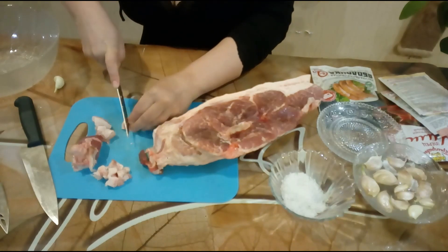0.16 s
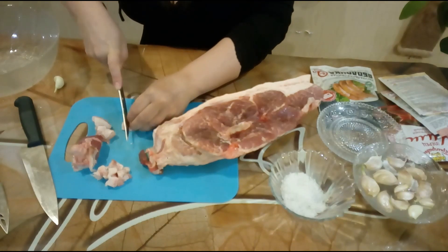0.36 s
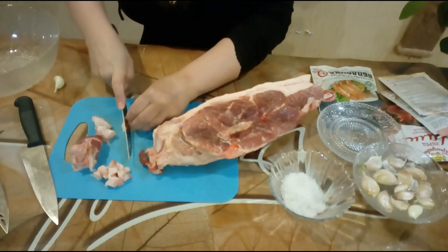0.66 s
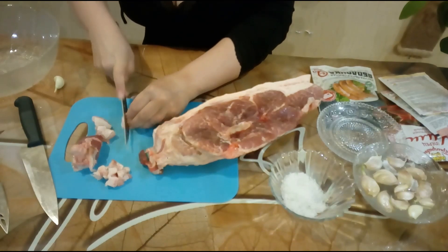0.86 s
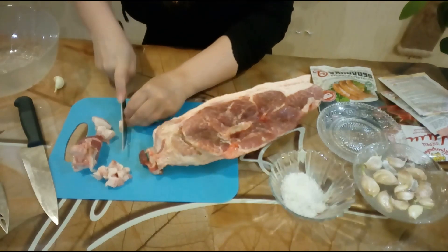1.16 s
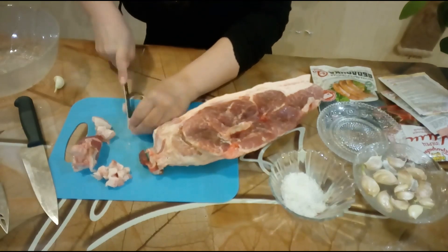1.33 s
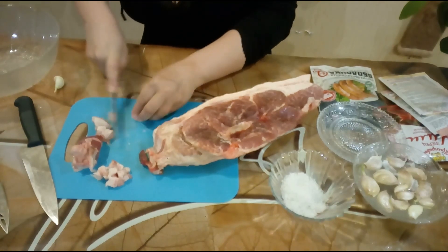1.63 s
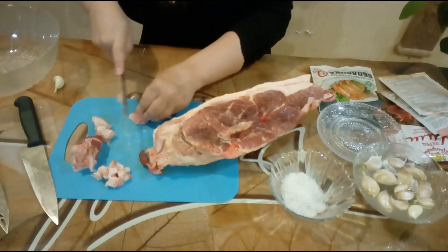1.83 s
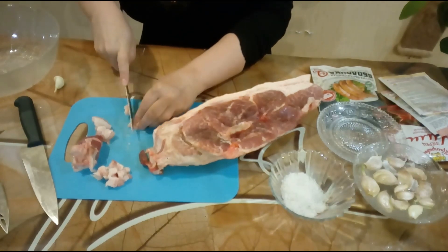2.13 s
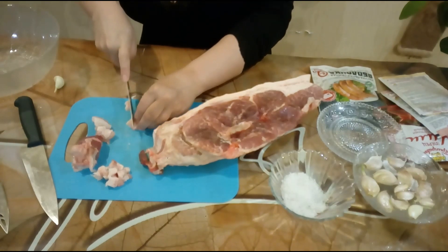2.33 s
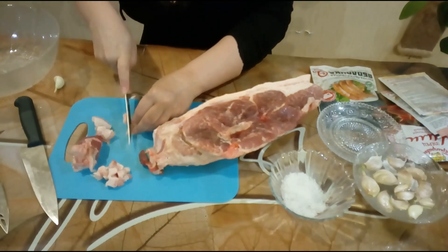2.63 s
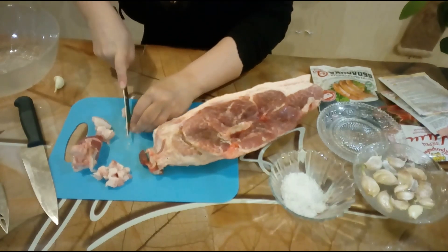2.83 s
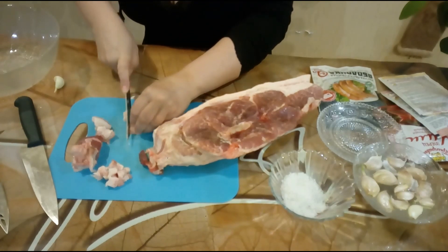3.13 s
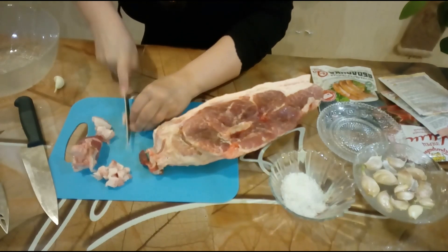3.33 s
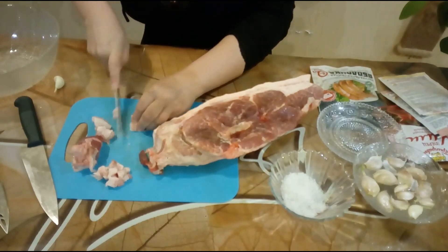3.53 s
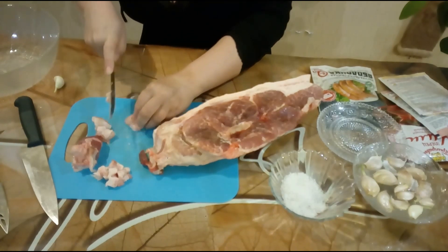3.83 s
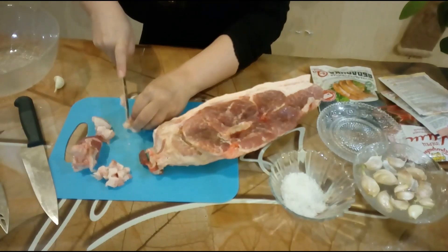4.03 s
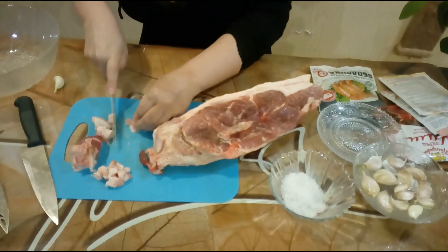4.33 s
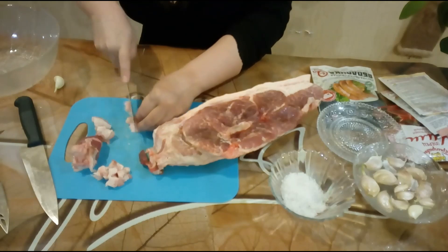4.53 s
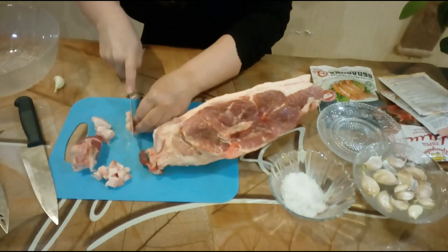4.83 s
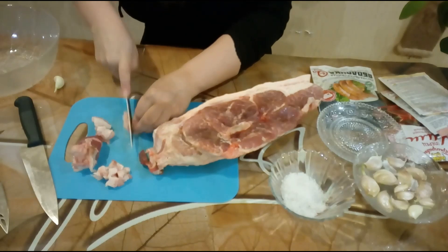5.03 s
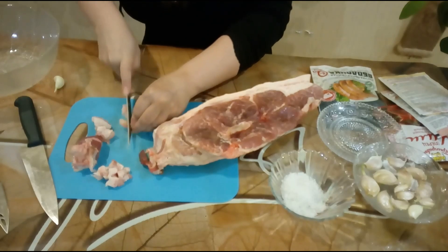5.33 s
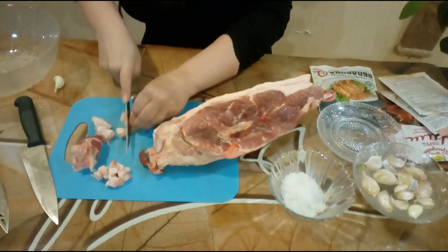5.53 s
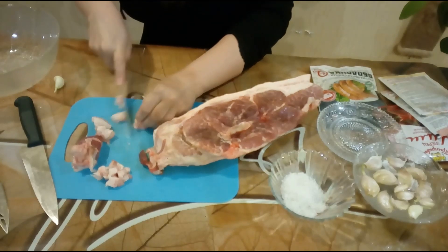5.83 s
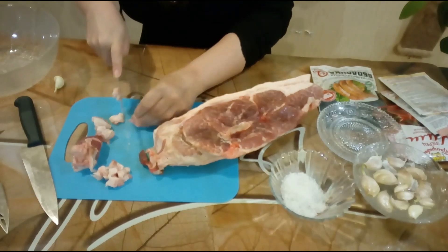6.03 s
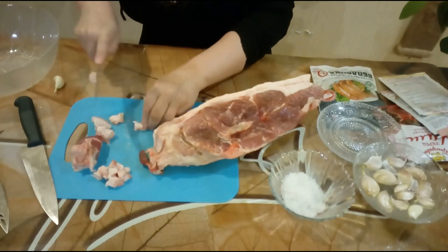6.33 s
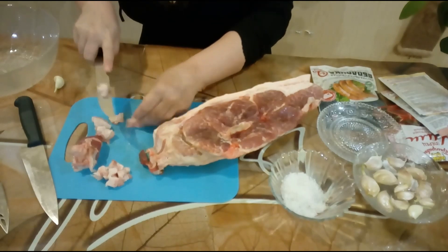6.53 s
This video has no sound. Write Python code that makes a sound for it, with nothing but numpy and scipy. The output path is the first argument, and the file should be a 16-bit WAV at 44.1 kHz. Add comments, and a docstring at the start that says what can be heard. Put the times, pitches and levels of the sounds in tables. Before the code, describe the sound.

In a small, slightly echoing kitchen with a faint appliance hum, a knife cuts fat on a plastic board, heard from nearby. A first run of quick rubbing strokes thuds through the wooden table and ends with a short scrape. A lighter second run ends in a squeaky flick of the blade. One sharp knock follows, then a third run of strokes and a last brief scrape.

```python
"""A small, live kitchen with a humming appliance. A knife saws fat into cubes on a plastic board
on a wooden table, in three runs of quick strokes. Each stroke is a swarm of tiny slips: force sets
the level, a leaning hand adds table thud, bare steel rings and sizzles. Each run ends with a sideways
flick of the edge. The knife knocks down twice: once cushioned by fat, once hard."""
import sys
import numpy as np
from scipy import signal
from scipy.fft import rfft, irfft, next_fast_len
from scipy.io import wavfile
from scipy.ndimage import uniform_filter1d, map_coordinates

SR = 44100
rng = np.random.default_rng(int(sys.argv[2]) if len(sys.argv) > 2 else 0)


def store_wav(level_fs):
    """Save 16-bit WAV to argv[1]."""
    pcm = np.round(np.clip(np.atleast_2d(level_fs), -1, 1) * 32767)
    wavfile.write(sys.argv[1], SR, pcm.T.astype(np.int16))


N = 293600
SIZE, GUARD = 2 ** 15, 512  # samples: one event with its echo, margin ahead of it
LEAD_S = .15  # from the start of an event's buffer to full pressure
HZ = np.fft.rfftfreq(SIZE, 1 / SR)
SIDES = np.array([[.5], [-.5]])  # left, right

# Contact spectra of table thud, edge drag and edge rasp. Each row: frequency in Hz, relative level in dB.
THUD_DB = [(20, -30), (50, -12.5), (115, -8), (165, -3.5), (215, 1), (330, -10), (450, -26.5), (700, -35.5),
           (3000, -61.5)]
DRAG_DB = [(100, -32.5), (300, -8.5), (480, 1), (680, -1), (1000, -5), (1400, -7.5), (2200, -16.5),
           (3200, -35.5), (9000, -79.5)]
RASP_DB = [(200, -50), (1000, -14), (2000, 1.5), (2800, 4.5), (3400, 0.5), (4800, -1), (6000, -5.5),
           (7200, -11.5), (8000, -25.5), (9600, -32.5), (12500, -47), (15500, -33)]


def amp(db):
    """Decibels to gain."""
    return 10 ** (np.asarray(db) / 20)


def unit(x):
    """Scale to rms 1."""
    return x / np.sqrt(np.mean(abs(x) ** 2) + 1e-20)


def along(points, hz):
    """Interpolate (Hz, value) points on a log axis."""
    f, v = np.transpose(points)
    return np.interp(np.log(hz + 1), np.log(f + 1), v)


def add(track, start_s, sound):
    """Mix in a stereo event, skipping ahead by its GUARD margin."""
    part = track[:, max(round(start_s * SR) - GUARD, 0):][:, :SIZE]
    part += sound[:, :part.shape[1]]


def wobble(knots_per_s):
    """Smooth random curve over time."""
    knots = rng.standard_normal(int(N * knots_per_s / SR) + 4)
    return map_coordinates(knots, [np.arange(N) * knots_per_s / SR])


def ripple(step_hz):
    """Smooth random curve over frequency."""
    return map_coordinates(rng.standard_normal(512), [HZ / step_hz], mode="mirror")


def pair(two, coherence):
    """Mix two independent spectra into left and right of the given coherence."""
    turn = np.arccos(np.clip(coherence, -1, 1)) / 2
    mid, side = two[0] * np.cos(turn), two[1] * np.sin(turn)
    return np.array([mid + side, mid - side])


def causal(db):
    """Minimum-phase response with the given gains."""
    cepstrum = irfft(np.log(amp(db)))
    cepstrum[1:SIZE // 2] *= 2
    cepstrum[SIZE // 2 + 1:] = 0
    return np.exp(rfft(cepstrum))


def room_air(level_db=-64):
    """Steady noise of the room."""
    # Each row: frequency in Hz, then relative level in dB / left over right in dB / stereo coherence.
    spectrum_db = [(12, -12), (25, -19.5), (55, -12), (92, 0), (165, -6), (300, -6.5), (520, -10),
                   (1200, -17), (2150, -13.5), (3260, -21), (4800, -16), (8000, -30), (11000, -32),
                   (15500, -33.5)]
    left_db = [(100, -4), (400, 0), (1300, -1), (2400, 3.5), (4400, 2), (8000, -1.5), (15000, 7)]
    coherence = [(40, 0.64), (180, 0.62), (500, 0.21), (1200, 0.17), (8000, 0.13)]
    hz = np.fft.rfftfreq(N, 1 / SR)
    colour = amp(along(spectrum_db, hz) + SIDES * along(left_db, hz))
    noise = pair(rfft(rng.standard_normal((2, N))), along(coherence, hz))
    return amp(level_db) * unit(irfft(noise * colour, N))


def appliance_hum(waver_db=2.5, drift_rad=0.65, left_db=-4):
    """Two tones, slightly unsteady in level and phase."""
    # Each row: frequency in Hz, rms level in dB.
    tones = [(187, -66), (560.5, -87.5)]
    t, hum = np.arange(N) / SR, np.zeros(N)
    for hz, db in tones:
        peak = np.sqrt(2) * amp(db + waver_db * wobble(7.0))
        hum += peak * np.sin(2 * np.pi * hz * t + drift_rad * wobble(18))
    return amp(SIDES * left_db) * hum


def kitchen(lag_s=.00004, bounce_s=.0069, bounce_db=-8, build_s=0.00067, scatter_hz=3500, spot_db=1.57):
    """Return carry(): spectrum to stereo sound by direct path, near bounce and a fresh echo."""
    # Each row: frequency in Hz, then T60 in s / echo level in dB / echo coherence / left over right in dB.
    t60_s = [(100, 0.45), (300, 0.34), (700, 0.42), (2500, 0.38), (5000, 0.31), (8000, 0.29), (15000, 0.24)]
    wet_db = [(100, 0), (300, 1.5), (1000, 3), (3000, 1), (8000, -3.5)]
    coherence = [(60, .5), (150, 0.81), (280, 1), (550, 0.67), (1200, -0.21), (2500, 0.081), (6000, 0.0005)]
    left_db = [(100, -5), (380, -1), (1300, -3), (2400, 0.5), (4400, -5.5), (8000, -6.5), (14000, 0)]
    hz, t, _ = signal.stft(np.zeros(SIZE), SR, nperseg=256)
    fade = amp(-60 * t / along(t60_s, hz)[:, None]) * (1 - np.exp(-t / build_s))
    direct = np.exp(-2j * np.pi * HZ * lag_s * (.5 + SIDES))  # left lags
    early = direct * (1 + amp(bounce_db) * np.exp(-2j * np.pi * HZ * bounce_s))
    wet, balance = amp(along(wet_db, HZ)), amp(SIDES * along(left_db, HZ))

    def band_rms(z):
        return np.sqrt(abs(uniform_filter1d(abs(z) ** 2, size=120, axis=-1)) + 1e-12)

    def carry(spectrum, echo_db=0):
        noise = signal.stft(rng.standard_normal((2, SIZE)), nperseg=256)[2]
        tail = rfft(signal.istft(noise * fade, nperseg=256)[1][:, :SIZE])
        echo = amp(echo_db) * wet * pair(tail / band_rms(tail), along(coherence, HZ))
        # Short waves scatter off hands and bowls.
        scatter_rad = np.minimum(HZ / scatter_hz, 1.5) * [ripple(959) for side in SIDES]
        path = early * np.exp(1j * scatter_rad) + echo
        path /= band_rms(path).mean(axis=0)
        # Each spot on the board favours other high modes.
        colour = causal(spot_db * np.minimum(HZ / 1200, 1) * ripple(128.9))
        return np.roll(irfft(spectrum * colour * balance * path), GUARD, axis=1)
    return carry


def body(spectrum_db):
    """Unit-energy response: a contact spectrum shaped by the modes of board, table and dishes."""
    # Each row: frequency in Hz, width in Hz, lift in dB.
    modes = [(162.7, 55, 5.5), (193.3, 55, 6.5), (257, 16, 7.5), (334.8, 55, 11), (368.7, 17, 8),
             (466, 12, 1), (580, 8.9, 7.5), (624, 15.4, 2.5), (655.6, 22.5, 6), (690.5, 19, 7),
             (790, 46, 1), (1200, 88, 5.5), (1340, 54, 7), (1680, 36, 9), (1825, 77, 10), (2100, 40, 12),
             (2410, 12, -9), (2540, 20, 4), (2955, 33, -2.5)]
    lift_db = sum(db / (1 + (2 * (HZ - hz) / width_hz) ** 2) for hz, width_hz, db in modes)
    return unit(causal(along(spectrum_db, HZ) + lift_db))


def blade(pitch=1):
    """Unit-energy response of the ringing steel, rolled off above 10 kHz."""
    # Each row: frequency in Hz, width in Hz, relative level in dB.
    modes = [(3600, 89, -0.5), (3987, 52, 12.5), (4970, 200, -2), (6600, 69, -27), (6670, 93, -2)]
    ring = sum(amp(db) * 1j * HZ * width_hz / ((hz * pitch) ** 2 - HZ ** 2 + 1j * HZ * width_hz)
               for hz, width_hz, db in modes)
    return unit(ring / (1 + (HZ / 10000) ** 4))


def slips(rise_s, fall_s, per_s, scatter_db, lumps_db=2.0, lumps_per_s=130):
    """Flat spectrum of stick-slip jerks: pressure swells, catches on lumps in the fat, lets go."""
    t = np.arange(SIZE) / SR - LEAD_S
    pressure = np.exp(-2 * (t / np.where(t < 0, rise_s, fall_s)) ** 2)
    lumps = amp(lumps_db * np.interp((t + LEAD_S) * lumps_per_s, np.arange(256), rng.standard_normal(256)))
    sizes = amp(scatter_db * np.clip(rng.standard_normal(SIZE), -2, 2)) * rng.choice([-1, 1], SIZE)
    slipping = rng.random(SIZE) < per_s / SR
    jerks = rfft(pressure * lumps * sizes * slipping)
    band_rms = np.sqrt(abs(uniform_filter1d(abs(jerks) ** 2, size=90)) + 1e-9)
    return jerks / band_rms * np.linalg.norm(pressure)


def flicks(carry):
    """The edge chatters sideways over the board, sweeping a cube away."""
    # Each row: peak time in s, rise in s, fall in s, scrape in dB, board chirp in dB.
    sweeps = [(1.75, 0.019, 0.021, -39.5, -58), (3.703, 0.019, 0.011, -30.5, -33.5),
              (5.999, 0.016, 0.019, -36, -45.5)]
    # Each row: frequency in Hz, relative level in dB.
    scrape_spectrum = [(30, -21), (100, -8), (180, -6), (320, -11), (600, -4.5), (900, 1.5), (1350, -6),
                       (2000, -3), (3200, 2.5), (3700, -6), (4800, -2.5), (6000, -17), (7200, -21),
                       (8200, -31.5), (15000, -50)]
    chirp_spectrum = [(500, -44), (1500, -17.5), (2200, -12), (2650, 4.5), (3100, 3), (3600, -51),
                      (4600, -9), (6000, -44), (12000, -80)]
    out, scrape, chirp = np.zeros((2, N)), body(scrape_spectrum), body(chirp_spectrum)
    for peak_s, rise_s, fall_s, scrape_db, chirp_db in sweeps:
        chatter = slips(rise_s, fall_s, per_s=1800, scatter_db=3)
        contact = amp(scrape_db) * scrape + amp(chirp_db) * chirp
        add(out, peak_s - LEAD_S, carry(contact * chatter, echo_db=-4.5))
    return out


def knocks(carry, gain_db=34.5, travel_at_1khz_s=0.001397):
    """The knife lands: the edge cracks on the plastic, the table thumps."""
    # Each row: start in s, thump and crack in dB before gain_db, contact cut-off in Hz.
    blows = [(0.6287, -41.5, -40, 1850), (4.4994, -25, -32.5, 13000)]
    # Each row: frequency in Hz, relative level in dB.
    thump_spectrum = [(25, -14), (70, -19), (110, -12), (155, -1), (250, 0), (450, 0.5), (700, 0),
                      (1000, -17), (1500, -18), (3000, -13), (8000, -90)]
    crack_spectrum = [(200, -26), (900, 3.5), (2000, -4.5), (2700, 3), (3400, -1.5), (4200, 3), (6100, 0),
                      (7300, -22), (10000, -28.5), (15500, -37)]
    out, thump, crack = np.zeros((2, N)), body(thump_spectrum), body(crack_spectrum)
    bending = np.exp(-4j * np.pi * travel_at_1khz_s * np.sqrt(HZ * 1000))  # high waves run faster
    for start_s, thump_db, crack_db, cutoff_hz in blows:
        cushion = causal(-10 * np.log10(1 + (HZ / cutoff_hz) ** 10))
        add(out, start_s, carry(amp(thump_db) * cushion * thump, echo_db=7.5))
        add(out, start_s, carry(amp(crack_db) * cushion * bending * crack, echo_db=-3.0))
    return amp(gain_db) * out


def crunch(decay_s):
    """Unit-energy spectrum of a dying burst of micro-impacts."""
    burst = rng.standard_normal(SIZE) * np.exp(-np.arange(SIZE) / SR / decay_s)
    return rfft(burst / np.linalg.norm(burst))


def bites(carry, gain_db=29.5):
    """The edge breaks through to the board: a thud if the hand leans, a ringing click if it is light."""
    # Each row: start in s, decay in s, force in dB before gain_db, lean on the board in dB.
    contacts = [ (0.554, 0.0058, -55.5, 6), (0.703, 0.001, -44, 7.5), (.7388, 0.0085, -38, 5),
                (0.7605, 0.0035, -41.5, -1), (0.878, .006, -61.5, -7), (.961, 0.0024, -48, 9),
                (1.044, 0.0064, -38.5, -1), (1.221, 0.0055, -43, 12.5), (1.744, 0.0018, -48.5, -3),
                (2.96, 0.01, -59, -6), (3.113, .002, -46, 4), (3.4986, 0.0071, -44.5, 2),
                (3.693, 0.0038, -44.5, -3.5), (4.417, .02, -72, -9), (5.033, .005, -59, 1),
                (5.054, .004, -49.5, 2.5), (5.192, 0.00082, -47, -4), (5.321, 0.0011, -44, -3),
                (5.485, 0.002, -44, 0), (5.513, .003, -44, 2), (5.751, 0.0022, -53, -6)]
    out = np.zeros((2, N))
    thud, drag, click, steel = body(THUD_DB), body(DRAG_DB), body(RASP_DB), blade()
    for start_s, decay_s, force_db, lean_db in contacts:
        table = amp(0.71 + 0.69 * lean_db) * thud
        edge = (amp(.1 * lean_db) * drag
                + amp(-1.4 - 1.52 * lean_db) * click
                + amp(-11 - 0.71 * lean_db) * steel)
        add(out, start_s, carry(amp(force_db) * (table + crunch(decay_s) * edge)))
    return amp(gain_db) * out


def sawing(carry, rise_share=0.68, grip_detune=0.012, board_lag_s=.002):
    """Heavy slips shake table and board, the edge rubs, fine slips rasp and ring, wet fat sizzles."""
    # Each row: peak time in s, length in s, force in dB, lean in dB, bare steel in dB (0 = buried in fat).
    strokes = [ (.58, 0.098, -54, 4.5, 14), (.655, 0.064, -45.5, 9.5, 11), (.757, 0.081, -37, 4, 5.5),
               (.935, 0.068, -37, 7, 1.6), (1.061, 0.06, -33, 0.5, 6), (1.204, 0.064, -32, 2.5, 7.8),
               (1.34, 0.086, -40, -2, 13.6), (1.478, 0.079, -33.5, -4.5, 4.8), (1.635, .11, -39, -1, 3),
               (2.826, 0.088, -53, 7.5, 27), (2.98, 0.091, -57.5, 4.5, 18), (3.135, 0.074, -40, 2, 19.6),
               (3.26, 0.11, -44.5, -12.5, 1), (3.389, 0.11, -43, -11.5, 3.2), (3.53, 0.09, -41, -2, 3),
               (3.582, 0.087, -41.5, -2.5, 3), (5.09, 0.086, -40.5, 3, 17.4), (5.233, 0.056, -41, 6, 5.2),
               (5.356, 0.062, -35, 1, 21), (5.52, 0.073, -35, 2, 5), (5.658, 0.094, -41.5, -5.5, 10),
               (5.812, 0.11, -37, -3, 1)]
    # Each row: frequency in Hz, relative level in dB.
    hollow_spectrum = [(60, -36.5), (200, -15), (300, 4.5), (400, -2), (500, -9.5), (700, -15),
                       (3000, -68.5)]
    rub_spectrum = [(200, -35.5), (380, -10), (480, -1), (560, -3), (680, -2.5), (850, -14.5),
                    (1500, -48.5)]
    sizzle_spectrum = [(3000, -47), (6500, -1), (8000, -1), (9600, 0.5), (12000, -12), (15500, -8)]
    thud, drag, rasp = map(body, (THUD_DB, DRAG_DB, RASP_DB))
    hollow, rub, sizzle = map(body, (hollow_spectrum, rub_spectrum, sizzle_spectrum))
    out = np.zeros((2, N))
    for peak_s, length_s, force_db, lean_db, bare_db in strokes:
        rise_s, fall_s = length_s * rise_share, length_s * (1 - rise_share)
        steel = blade(pitch=1 + grip_detune * rng.standard_normal())  # grip and clinging fat detune it
        heavy = slips(rise_s * 0.94, fall_s, per_s=900, scatter_db=3.0)
        heavy *= np.exp(-2j * np.pi * HZ * board_lag_s)  # the board gives just after the cut begins
        heavy *= (amp(-1.4 + 1.25 * lean_db) * thud
                  + amp(0.3 + 0.64 * lean_db + 0.066 * bare_db) * hollow)
        fine = slips(rise_s, fall_s * 1.07, per_s=800, scatter_db=4.5)
        fine *= (amp(-0.78 + 0.027 * lean_db) * drag
                 + amp(-6 - 0.19 * lean_db + 0.024 * bare_db) * rasp
                 + amp(-22.5 + 0.72 * bare_db) * steel)
        wet = slips(rise_s * 1.27, fall_s * 0.63, per_s=720, scatter_db=4.5)
        wet *= amp(-36 - 0.027 * lean_db + 0.54 * bare_db) * sizzle
        slide = slips(rise_s, fall_s, per_s=1500, scatter_db=1.5)
        slide *= amp(-10 - 0.68 * lean_db - 0.1 * bare_db) * rub
        add(out, peak_s - LEAD_S, carry(amp(force_db) * (heavy + slide + fine + wet)))
    return out


def scene():
    """Knife work over room air and hum."""
    carry = kitchen()
    knife = sawing(carry) + flicks(carry) + bites(carry) + knocks(carry)
    return knife + room_air() + appliance_hum()


def record(dry):
    """Brick-wall low-pass."""
    top_hz, size = 15800, next_fast_len(N + SIZE)
    passband = np.fft.rfftfreq(size, 1 / SR) < top_hz
    return irfft(rfft(dry, size) * passband, size)[:, :N]


dry = scene()
out = record(dry)
store_wav(out)
```